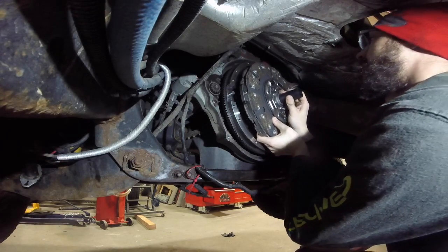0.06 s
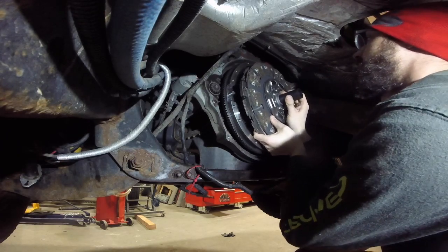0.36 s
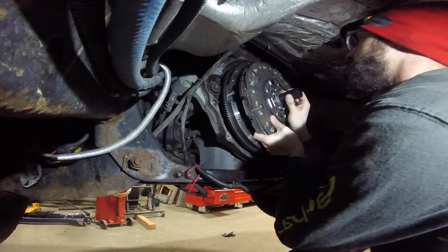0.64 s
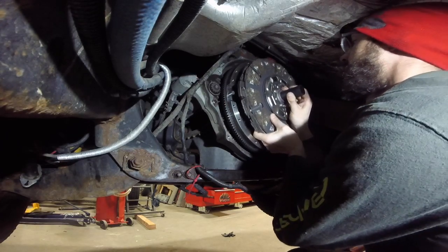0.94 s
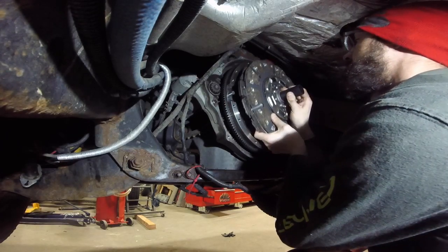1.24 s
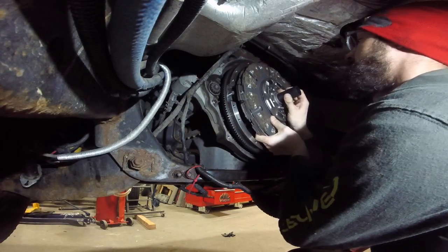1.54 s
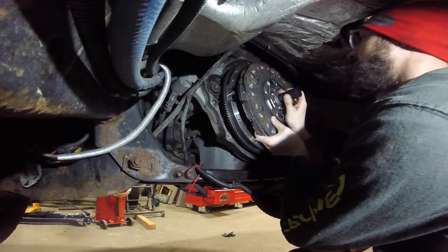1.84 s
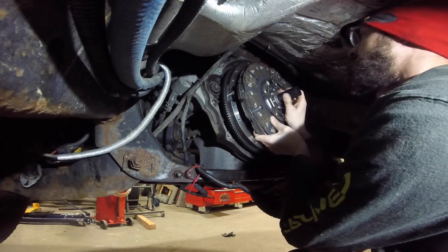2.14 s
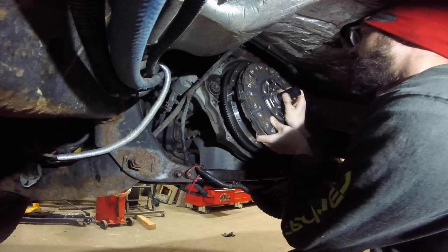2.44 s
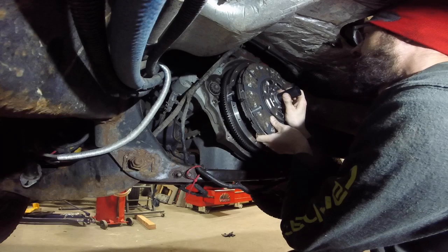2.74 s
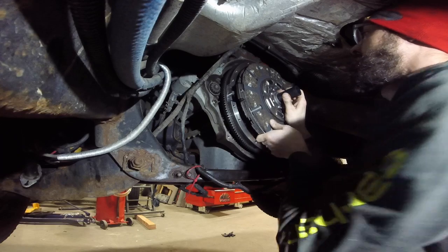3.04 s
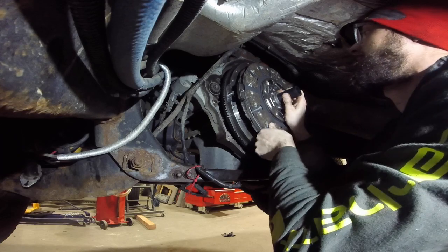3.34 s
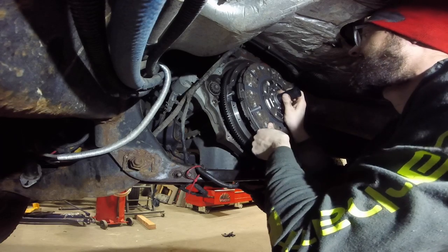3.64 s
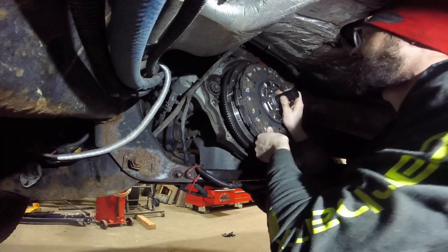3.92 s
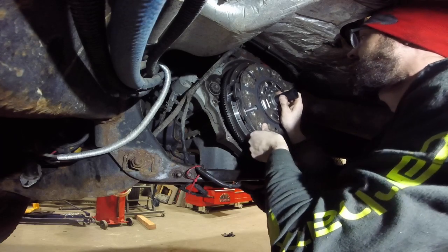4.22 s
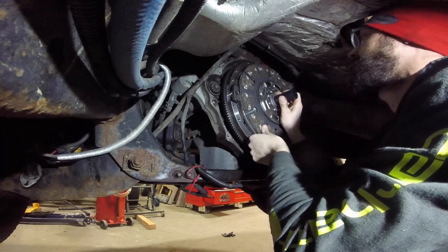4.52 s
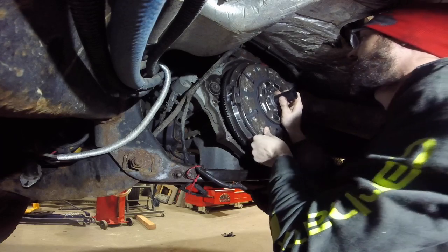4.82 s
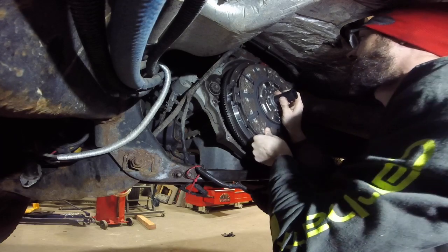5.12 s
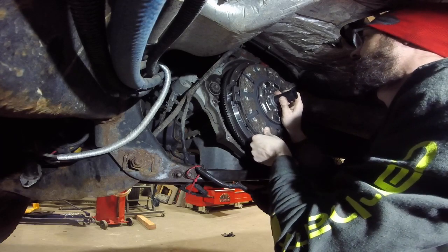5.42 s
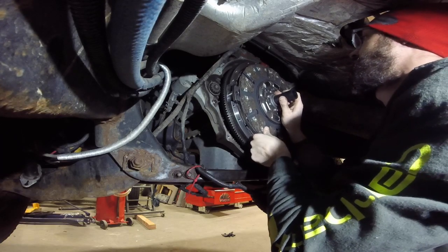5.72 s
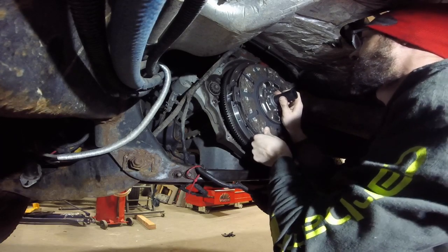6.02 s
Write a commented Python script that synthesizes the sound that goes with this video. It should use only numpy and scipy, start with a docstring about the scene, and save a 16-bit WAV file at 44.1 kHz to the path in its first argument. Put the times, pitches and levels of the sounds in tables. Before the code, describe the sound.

A steel hand tool knocks, clinks and scrapes on the bolts of a loose clutch, some blows ringing briefly, over a low workshop rumble.

```python
"""A steel hand tool works on the bolts of a clutch under a car, over a workshop's low rumble.
First a bolt pings, the underbody booms and the pressure plate sings faintly. From 0.3 s the tool
knocks, chattering and shaking the loose clutch, and some blows make its cover clink. From 1.4 s
steel scrapes between the knocks. At 1.6 s a hard blow sets tool and plate ringing. Loud knocks come
at 4 s, scraping steel squeaks faintly at 4.67 s, and more knocks follow at 5 s and, softer, near 6 s."""
import sys
import numpy as np
from scipy import signal
from scipy.fft import rfft, irfft
from scipy.io import wavfile
from scipy.ndimage import uniform_filter1d

SR = 44100
rng = np.random.default_rng(int(sys.argv[2]) if len(sys.argv) > 2 else 0)


def wrap_up_sound(samples):
    """Save the sound to the file named by the first command line argument, as 16-bit audio."""
    columns = np.atleast_2d(samples).T
    # keep every value between -1 and 1, then stretch to whole-number steps
    tamed = np.clip(columns, -1, 1)
    steps = np.round(tamed * 32767).astype(np.int16)
    wavfile.write(sys.argv[1], SR, steps)


N = 267687
T = np.arange(N) / SR

# The workshop's rumble and hiss. Each row: frequency in Hz, relative level in dB.
AIR_COLOUR = [(13, -30.5), (22, -9), (54, 0), (91, -8), (137, -8.5), (237, -20.5), (264, -22.5), (311, -19),
              (387, -19), (431, -23), (468, -21), (830, -18), (978, -35), (2160, -37), (15000, -63)]
# Touches that ping a bolt, and blows that ring the tool. Each row: start in seconds, level in dB.
BOLT_PINGS = [(0.001, -59.5), (.379, -54), (.98, -56), (1.035, -48), (1.636, -48), (3.992, -52)]
TOOL_RINGS = [(1.636, -8), (3.993, -18), (4.084, -39)]
# Shoves on the underbody; blows on the clutch cover, plus a faint high squeak of scraping steel
# at 4.67 s. Each row: start in seconds, level in dB, pitch in Hz that the contact favours.
BOOMS = [(0.001, -36.5, 160), (.407, -37.5, 200), (.59, -42, 216), (2.576, -36, 222), (4.981, -39, 202),
         (5.668, -37, 371), (5.982, -38, 365)]
CLINKS_AND_SQUEAK = [(.265, -23.5, 964), (.41, -23.5, 1620), (1.636, -8.5, 2756), (3.991, -17, 1980),
                     (4.272, -38, 2420), (4.672, -62.5, 7150), (4.977, -24.5, 1350), (5.004, -15, 1840),
                     (5.665, -19, 1003), (5.978, -27.5, 2070)]
# Touches that leave the pressure plate singing. Each row: start in seconds, level of the lower
# tone in dB, level of the upper tone in dB, seconds to fade by 60 dB (called t60).
PLATE_RINGS = [(0.005, -43, -50, 0.85), (.265, -45, -34, 0.85), (0.999, -41.5, -43.5, 2.8),
               (1.636, -18.5, -50, 7.9), (1.855, -24, -32.5, 1.4), (1.949, -30, -47, 2.54),
               (2.571, -32, -24, 0.85), (2.731, -25, -21, 0.41), (3.76, -43.5, -52, 1.7),
               (3.994, -26, -44, 0.47), (4.975, -4.5, -39, 0.14)]
# Knocks of the tool. Each row: start in seconds, thud level in dB,
# hardness (the tick's level above the thud) in dB, length of the chatter in seconds.
KNOCKS = [(0.2635, -22.5, -50, 0.028), (0.4068, -9, -31, 0.012), (.979, -45, -15, 0.0065),
          (1.029, -42.5, -19, 0.0066), (1.21, -35.5, -23, 0.0047), (1.2252, -44.5, -6, .003),
          (1.385, -35.5, -19, .0035), (1.397, -37, -15.5, 0.0031), (1.437, -36.5, -23, 0.0027),
          (1.5925, -44, -15.5, 0.0017), (1.6333, -10, -20, 0.013), (1.665, -15, -30.5, 0.018),
          (1.8428, -32, -44, 0.014), (1.9465, -28, -41.5, 0.031), (2.150, -34, -52.5, 0.015),
          (2.177, -38, -18.5, 0.0066), (2.208, -28, -46.5, 0.014), (2.441, -23, -46.5, 0.012),
          (2.5274, -54.5, 0, .0022), (2.569, -16.5, -35, .017), (2.729, -20.5, -30.5, 0.02),
          (2.771, -28, -38.5, .018), (3.133, -37, -42.5, .027), (3.757, -34.5, -29.5, 0.02),
          (3.7622, -51, 9, 0.0024), (3.9865, -18.5, -13, 0.0036), (3.991, -13, -13.5, 0.0088),
          (3.997, -10, -26, 0.0062), (4.0845, -24, -43.5, 0.013), (4.219, -32.5, -37, 0.025),
          (4.269, -23.5, -42, 0.019), (4.3647, -25, -30, .011), (4.975, -8.5, -36, 0.0098),
          (4.992, -13.5, -27, 0.0099), (5.0026, -18.5, -12.5, 0.0086), (5.035, -26.5, -23.5, 0.013),
          (5.059, -32.5, -13, 0.002), (5.16, -35, -26.5, .008), (5.435, -39.5, -59.5, 0.021),
          (5.664, -20.5, -37.5, 0.016), (5.976, -22.5, -31, 0.011)]
# Steel sliding on steel. Each row: start in seconds, thud level in dB, length in seconds.
SCRAPES = [(1.422, -45.5, 0.071), (2.544, -29, .051), (2.842, -45.5, 0.07), (4.169, -31, 0.05),
           (4.629, -32.5, 0.1), (4.886, -37, 0.051), (4.945, -29, 0.057), (5.078, -40, 0.073),
           (5.16, -35, 0.092), (5.298, -37, 0.063), (5.882, -36, 0.068)]

# Modes are the tones a part rings with.
# Each row: pitch in Hz, relative level in dB, seconds to fade by 60 dB.
BOLT_MODES = [(3294, 0.5, 0.52), (4600, -21, .12), (5320, -23.5, 0.16), (6400, -11, .16)]
PANEL_MODES = [(138, 0, 0.79), (159.7, -2, .5), (189, -5, 0.37), (224, -0.5, 0.45), (249.4, -10, 0.34),
               (297, -2, 0.51), (346.3, -3.5, 0.21), (387, 4.5, 0.25), (446, 3, 0.45)]
CLUTCH_MODES = [(375, -28.5, 0.092), (472.5, -21.5, 0.25), (553.2, -2, 0.038), (569.8, 2, 0.055),
                (710, -7.5, 0.017), (839.3, -7, 0.062), (931, -14, 0.14), (1000.6, -13.5, 0.021)]
COVER_AND_SQUEAK_MODES = [(970, 1.5, .07), (1328, 1.5, 0.082), (1592, -1.5, .09), (1706, -4, 0.053),
                          (1870, -2.5, 0.072), (2024, 5, .07), (2080, -13, 0.16), (2102, -3, 0.077),
                          (2386, -5.5, .12), (2694, 0, 0.093), (7150, 0.5, .24)]  # the 7150 Hz row is the squeak
TOOL_MODES = [(1570, -28.5, .35), (1920, -23, 0.3), (2319, 0, 0.05), (2359, -5, 0.13), (3000, -15.5, 0.041),
              (3690, -14, 0.052), (5260, -41, .08), (5900, -40.5, .1), (7100, -46.5, 0.068)]
# The clank of many crowded steel modes, and the bright tick of a contact.
# Each row: frequency in Hz, relative level in dB.
CLANK_COLOUR = [(100, -35), (220, -6), (330, -12.5), (600, 9), (1050, -2), (1300, -4.5), (1600, -2),
                (2000, 2), (2400, -4.5), (2800, -14), (3400, -12.5), (4500, -32), (8000, -66)]
TICK_COLOUR = [(1500, -19), (3000, 7), (4200, -0.5), (5100, 1), (5800, -7.5), (6800, -4), (9000, -17.5),
               (12000, -26), (15000, -34)]
# The near echoes, the room's tail and its treble. Each row: frequency in Hz, boost or cut in dB.
NEAR_ECHO = [(400, 9), (570, 0), (900, -6.5), (2500, 2), (5000, 2.5), (12000, -2)]
ROOM_TAIL = [(200, 12), (420, 16.5), (570, -3.5), (900, 2), (1900, 3), (2400, -4), (3300, -2), (5000, -7.5),
             (12000, -28.5)]
ROOM_TREBLE = [(700, -25.5), (2000, -8.5), (6000, -1), (12000, -11)]


def undb(db):
    """Turn decibels into a number to multiply by."""
    return 10 ** (np.asarray(db) / 20)


def add(out, start, sound):
    """Mix a sound into out, from a start time in seconds."""
    i = max(int(start * SR), 0)
    out[i:i + len(sound)] += sound[:N - i]


def colour(sound, points):
    """Boost or cut each frequency, following a curve through (Hz, dB) points."""
    size = 4096
    hz, db = np.transpose(points)
    bin_hz = np.arange(size // 2 + 1) * SR / size
    gain = undb(np.interp(np.log(bin_hz + 1), np.log(hz), db))
    # these steps keep the filter from answering before the sound arrives
    cepstrum = irfft(np.log(gain))
    cepstrum[1:size // 2] *= 2
    cepstrum[size // 2 + 1:] = 0
    return signal.fftconvolve(sound, irfft(np.exp(rfft(cepstrum))))[:len(sound)]


def fade(t, t60):
    """Die away by 60 dB every t60 seconds."""
    return np.exp(-np.log(1000) * t / t60)


def ring(modes, t, rise_s=0.00064):
    """A part rings: each mode is a sine wave that rises quickly, then fades."""
    onset = 1 - np.exp(-t / rise_s)
    return onset * sum(undb(db) * fade(t, t60) * np.sin(2 * np.pi * hz * t) for hz, db, t60 in modes)


def favour(modes, spot_hz, db_per_octave):
    """Modes near the pitch that the spot of contact favours ring the most."""
    return [(hz, db - db_per_octave * abs(np.log2(hz / spot_hz)), t60) for hz, db, t60 in modes]


def set_level(sound, db):
    """Scale a sound so that its loudest 10 ms have this level."""
    return sound * undb(db) / np.sqrt(uniform_filter1d(sound ** 2, size=441).max())


def flicker(count, spread_db, hold_samples):
    """A gain that jumps from one random value to the next."""
    return undb(spread_db * np.repeat(rng.standard_normal(count), hold_samples)[:count])


def air(level_db=-41, waver_db=0.5):
    """The workshop air: low rumble and faint hiss, wavering a little."""
    noise = colour(rng.standard_normal(N), AIR_COLOUR)
    waver = np.interp(T, np.linspace(0, T[-1], 40), rng.standard_normal(40))
    return noise / noise.std() * undb(level_db + waver_db * waver)


def bolt_pings():
    """A light touch makes a bolt ring high and clear."""
    out = np.zeros(N)
    for start, db in BOLT_PINGS:
        add(out, start, undb(db) * ring(BOLT_MODES, T[:SR]))
    return out


def underbody_booms(detune=0.03):
    """Low panel modes swell after a shove and linger; the load shifts their pitch a little."""
    out = np.zeros(N)
    for start, db, spot_hz in BOOMS:
        modes = [(hz * (1 + detune * rng.standard_normal()), mode_db, t60)
                 for hz, mode_db, t60 in PANEL_MODES]
        boom = ring(favour(modes, spot_hz, db_per_octave=11), T[:SR // 2], rise_s=0.0022)
        add(out, start, set_level(boom, db))
    return out


def pressure_plate(low_hz=838.6, high_hz=859, rise_s=0.0078):
    """Two close tones throb against each other; each touch changes their strength and fade time."""
    out, t = np.zeros(N), T[:2 * SR]
    stops = [row[0] for row in PLATE_RINGS[1:]] + [N / SR]
    for (start, low_db, high_db, t60), stop in zip(PLATE_RINGS, stops):
        now = start + t  # the waves run on unbroken through every touch
        low = undb(low_db) * np.sin(2 * np.pi * low_hz * now)
        high = undb(high_db) * np.sin(2 * np.pi * high_hz * now)
        onset = 1 - np.exp(-t / rise_s)
        release = np.exp(-np.maximum(now - stop, 0) / rise_s)
        add(out, start, onset * release * fade(t, t60) * (low + high))
    return out


def shake_clutch(push, thud_db, upper_db, clank_db, tick_db, upper_hz=650, spot_db=2.27, crack=0.056):
    """A push makes the clutch thud; the tiny impacts within it add a clank and a tick."""
    t = T[:len(push)]
    impacts = push * flicker(len(t), spread_db=5.5, hold_samples=32)
    thud = 0
    for hz, db, t60 in CLUTCH_MODES:
        # the hand's grip shifts each mode a little; the chatter drives it, drifting out of step
        drift = np.cumsum(rng.standard_normal(len(t))) * 0.051
        gripped_hz = hz * (1 + 0.005 * rng.standard_normal())
        mode = fade(t, t60) * np.exp(2j * np.pi * gripped_hz * t)
        drive = push * np.exp(1j * (2 * np.pi * (hz * t + rng.random()) + drift))
        # the spot that is struck decides how much each mode gets
        share_db = db + upper_db * (hz > upper_hz) + spot_db * rng.standard_normal()
        thud = thud + set_level(signal.fftconvolve(drive, mode)[:len(t)].imag, share_db)
    out = set_level(thud, thud_db)
    for points, db, t60 in ((CLANK_COLOUR, clank_db, 0.08), (TICK_COLOUR, tick_db, 0.04)):
        # modes too crowded to tell apart store each impact's energy and lose it fast
        keep = fade(1 / SR, t60) ** 2
        stored = signal.lfilter([1 - keep], [1, -keep], impacts ** 2)
        energy = stored + crack * impacts ** 2  # the impact itself cracks on top
        noise = np.sqrt(energy) * rng.standard_normal(len(t))
        out = out + set_level(colour(noise, points), db)
    return out


def knocks(blow_strength=8.2, blow_s=0.00096, rise_share=0.045):
    """The contact builds to a blow, then the parts chatter to rest; harder knocks are brighter."""
    out, t = np.zeros(N), T[:SR // 4]
    for start, thud_db, hard_db, length in KNOCKS:
        onset = 1 - np.exp(-(t / (rise_share * length)) ** 2)
        blow = blow_strength * np.exp(-t / blow_s)
        chatter = np.exp(-(t / length) ** 2)
        push = onset * (blow + chatter)
        upper_db = 6 + 0.23 * hard_db
        clank_db = thud_db + 1 + 0.43 * hard_db
        add(out, start, shake_clutch(push, thud_db, upper_db, clank_db, tick_db=thud_db + hard_db))
    return out


def clinks_and_squeak():
    """The clutch cover clinks, its tone set by where it is hit; once, scraping steel squeaks faintly."""
    out = np.zeros(N)
    for start, db, spot_hz in CLINKS_AND_SQUEAK:
        modes = favour(COVER_AND_SQUEAK_MODES, spot_hz, db_per_octave=41)
        add(out, start, undb(db) * ring(modes, T[:SR]))
    return out


def scrapes():
    """Steel slides on steel: the sound swells and dies, catching and slipping on the way."""
    out, t = np.zeros(N), T[:SR // 3]
    for start, db, length in SCRAPES:
        slips = flicker(len(t), spread_db=4.25, hold_samples=220)
        swell = np.sqrt(np.abs(np.sin(np.pi * np.minimum(t / length, 1))))
        scrape = shake_clutch(swell * slips, db, upper_db=3.5, clank_db=db - 12.5, tick_db=db - 29)
        add(out, start, scrape)
    return out


def tool_rings():
    """A blow sets the steel tool itself ringing briefly."""
    out = np.zeros(N)
    for start, db in TOOL_RINGS:
        add(out, start, undb(db) * ring(TOOL_MODES, T[:SR]))
    return out


def workshop_echoes(sound, build_s=0.0099):
    """Quick echoes between floor and car, then the room's faint tail, whose treble dies first."""
    t, room = T[:SR], 0
    onset = 1 - np.exp(-(t / build_s) ** 2)
    for db, t60, points in ((-17, 0.17, NEAR_ECHO), (-23, 1.0, ROOM_TAIL), (-29, 0.24, ROOM_TREBLE)):
        echoes = rng.standard_normal(SR) * fade(t, t60) * onset
        room = room + undb(db) * colour(echoes / np.linalg.norm(echoes), points)
    return signal.fftconvolve(sound, room)[:N]


def scene():
    """Mix the short steel sounds and their echoes with the plate, booms and air, in one channel."""
    steel = bolt_pings() + knocks() + clinks_and_squeak() + scrapes() + tool_rings()
    return (steel + workshop_echoes(steel) + pressure_plate() + underbody_booms() + air())[None]


def record(dry):
    """Clip peaks at full scale and cut the treble above 14900 Hz."""
    low_pass = signal.ellip(8, 0.2, 70, 14900, fs=SR, output="sos")
    return signal.sosfilt(low_pass, np.clip(dry, -1, 1))


dry = scene()
out = record(dry)
wrap_up_sound(out)
```